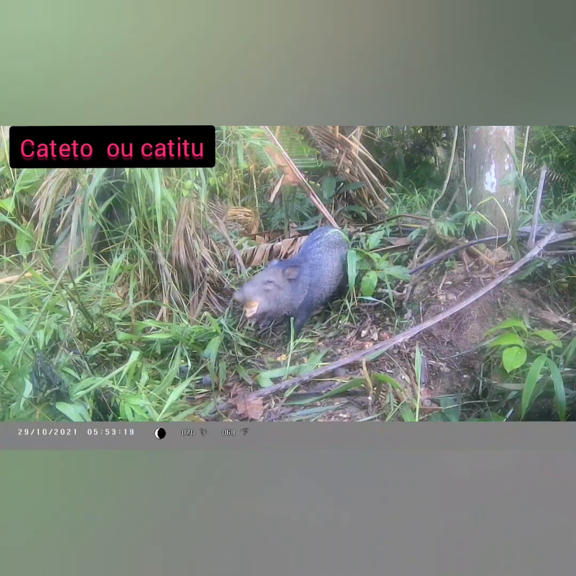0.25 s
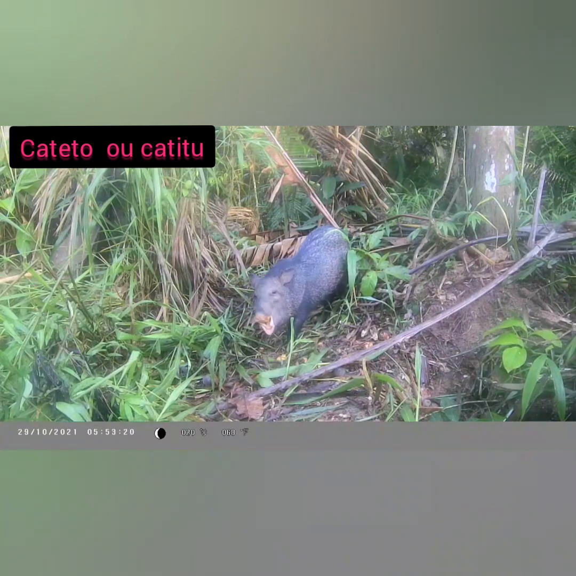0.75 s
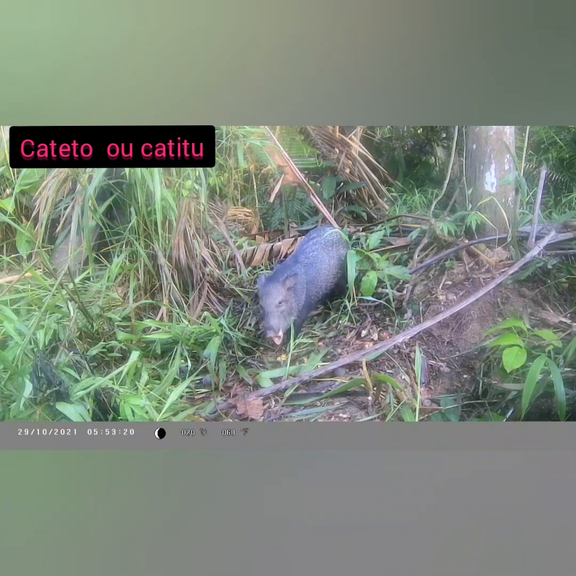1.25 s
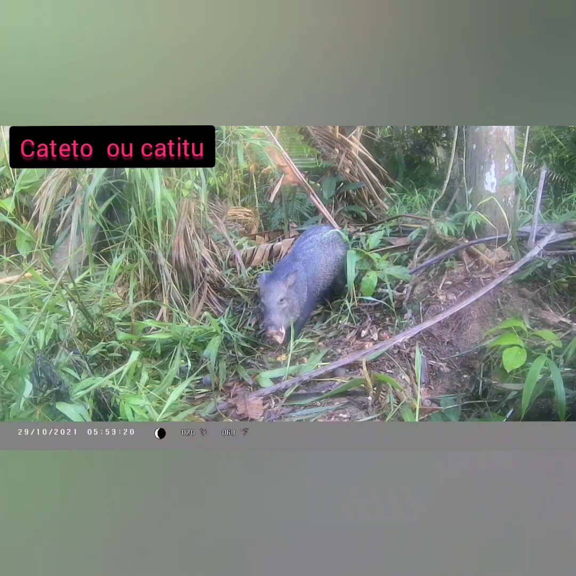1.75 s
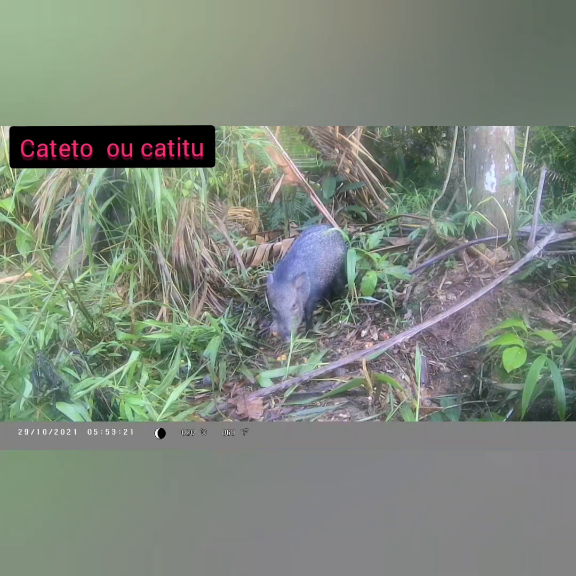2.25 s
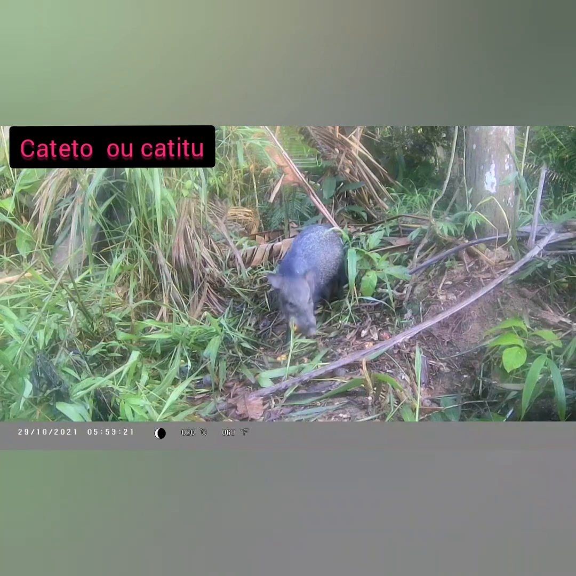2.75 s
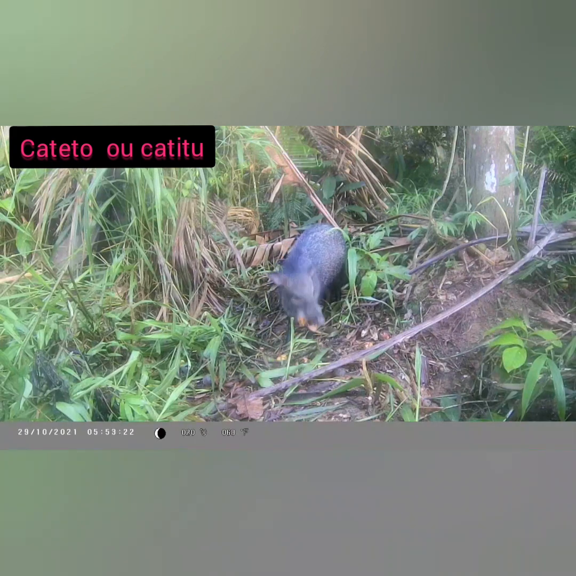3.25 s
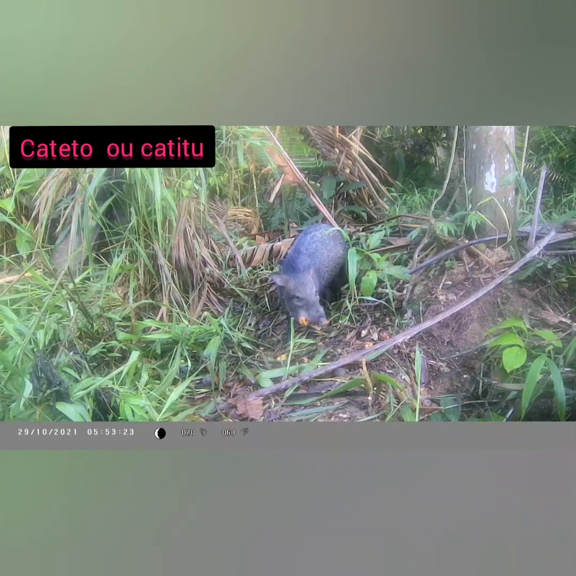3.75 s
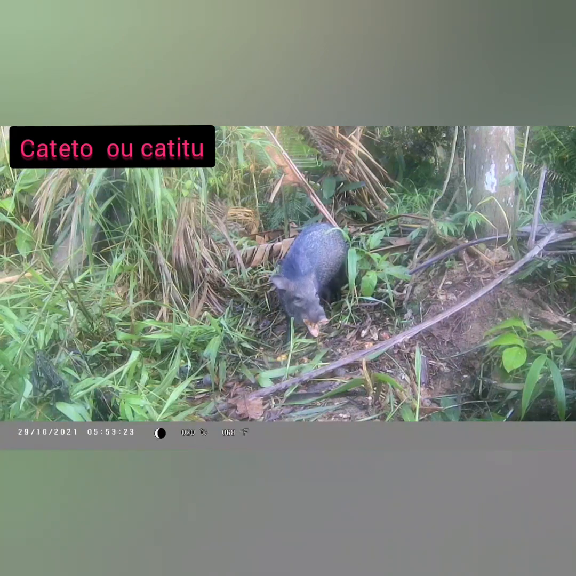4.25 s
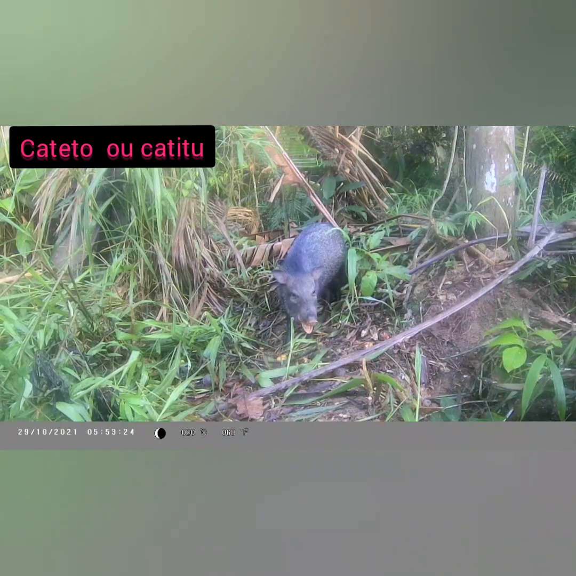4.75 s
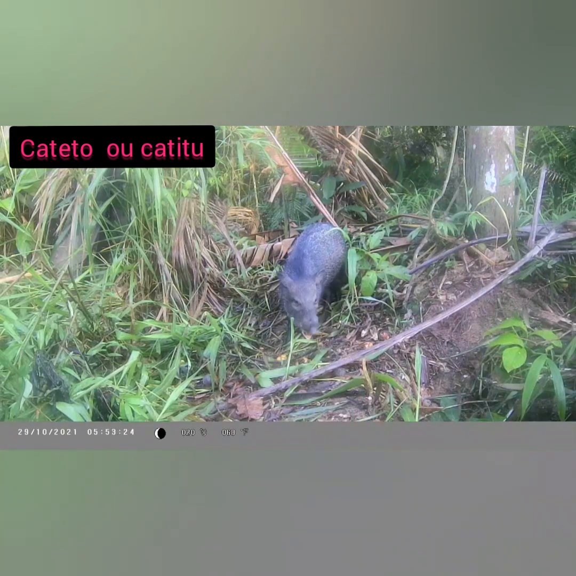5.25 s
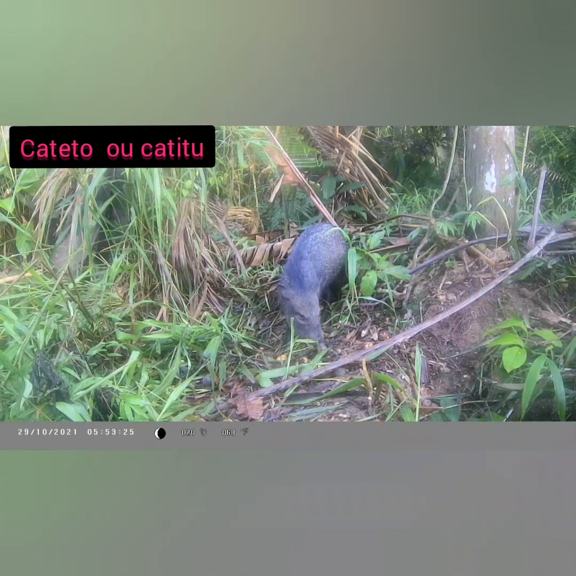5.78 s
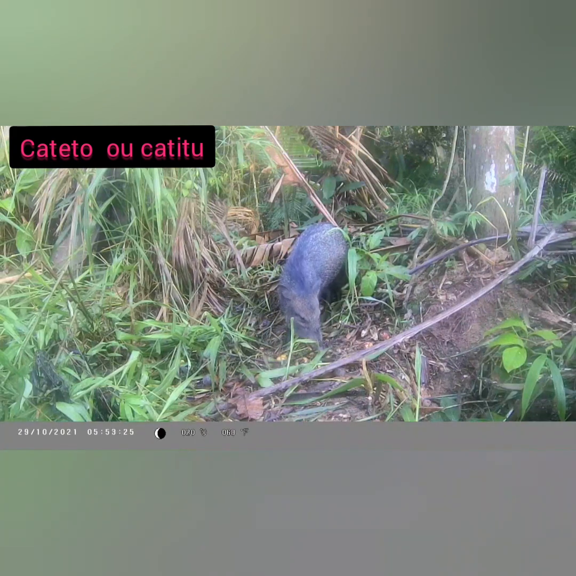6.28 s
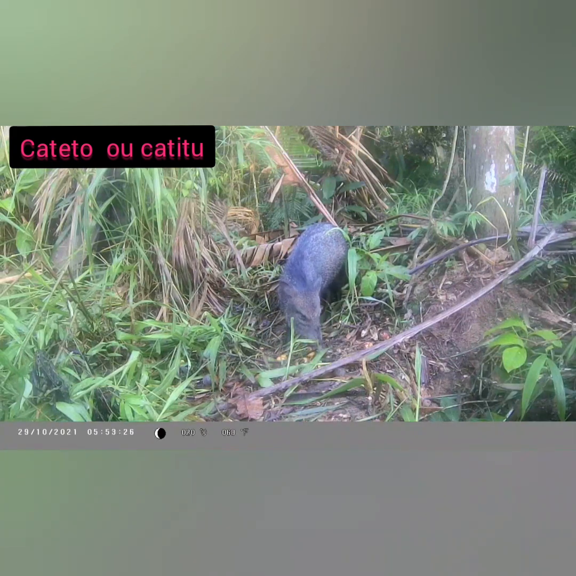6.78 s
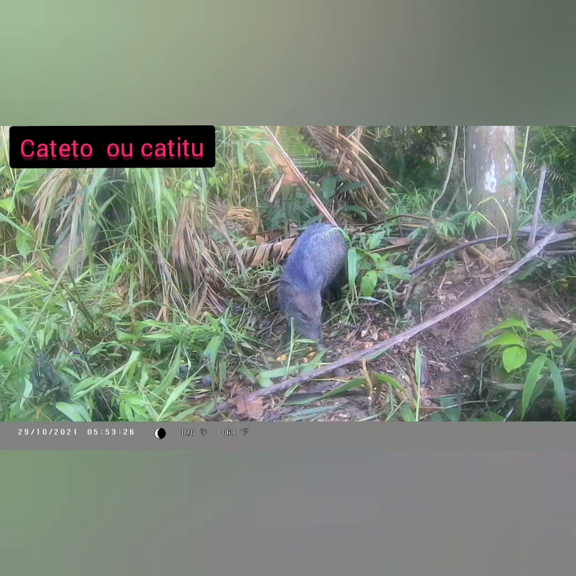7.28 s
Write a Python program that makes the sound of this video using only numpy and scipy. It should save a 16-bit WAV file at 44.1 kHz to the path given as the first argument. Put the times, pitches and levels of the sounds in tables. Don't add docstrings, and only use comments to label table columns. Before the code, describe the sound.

A forest at first light, heard through a small fixed microphone with a soft hiss and very low hum. A clipped frog peep opens, another follows at 0.2 s with a sharp twig snap, then close frogs whistle upward in pairs, long then short, at roughly 0.7, 1.1, 1.7, 2.3, 2.8, 3.1 and 3.7 s. Mid-distance peeps answer, blurred by echoes, over a continuous far chorus that swells around 1 s. High crickets trill in recurring bouts; a nearer one ticks in trains at 2.4-2.8 and 5.2-5.6 s. Faint birds whistle, most busily in the first 1.5 s. Leaves crackle lightly as an animal rummages, strongest from 1.9 to 3.5 s, with scattered snaps and hollow knocks throughout, including a clear snap near 5.0 s. Single peeps cluster at 4.1-5.0 s, pairs resume from 5.4 s, and a loud lone peep comes at 7.4 s near the end.

```python
import sys
import numpy as np
from scipy import signal
from scipy.fft import rfft, irfft
from scipy.io import wavfile

SR = 44100
rng = np.random.default_rng(int(sys.argv[2]) if len(sys.argv) > 2 else 0)


def to_linear_factor(level_db):
    exponent = np.asarray(level_db, float) / 20
    return 10 ** exponent


def unload_wav(signal):
    wavfile.write(
        sys.argv[1],
        SR,
        np.round(np.clip(np.atleast_2d(signal).T, -1, 1) * 32767).astype(np.int16),
    )


N = 331632
TIME = np.arange(N) / SR


def add(out, start_s, sound):
    i = int(round(start_s * SR))
    part = sound[max(-i, 0):max(N - i, 0)]
    out[max(i, 0):max(i, 0) + len(part)] += part


def unit(x):
    return x / np.sqrt(np.mean(x ** 2))


def band(x, lo_hz, hi_hz, order=2):
    return signal.sosfilt(signal.butter(order, [lo_hz, hi_hz], "bandpass", fs=SR, output="sos"), x)


def wander(position, points):
    return np.interp(position, np.arange(points), rng.standard_normal(points))


def whistle(length_s, first_hz, mid_hz, last_hz, swell, over_db=-60, ratio=2, flutter=0., throb=0.,
            attack_s=0.0024, waver=0.):
    flutter_per_s, waver_per_s, throb_hz, release_s = 226.4, 60, 195.5, 0.0041
    u = np.arange(int(length_s * SR)) / (length_s * SR)
    hz = first_hz * (1 - u) * (1 - 2 * u) + mid_hz * 4 * u * (1 - u) + last_hz * u * (2 * u - 1)
    drift = wander(u * length_s * waver_per_s, 32)
    phase = 2 * np.pi * np.cumsum(hz * (1 + waver * drift)) / SR
    edge = np.clip(np.minimum(u / attack_s, (1 - u) / release_s) * length_s, 0, 1)
    fade = wander(u * length_s * flutter_per_s, 64)
    second_voice = throb * u * np.sin(phase - 2 * np.pi * throb_hz * length_s * u)
    tone = np.sin(phase) + to_linear_factor(over_db) * np.sin(ratio * phase) + second_voice
    return np.sqrt(2) * edge * (1 + flutter * fade) * np.exp(swell * (u - 1)) * tone


def forest(calls, early_db, early_t60, late_db, late_t60, sparse=True):
    out = np.zeros(N)
    lag = np.arange(SR // 2) / SR
    early = to_linear_factor(-60 * lag / early_t60)
    late = to_linear_factor(-60 * lag / late_t60)
    shape = to_linear_factor(early_db) * early / np.linalg.norm(early) + to_linear_factor(late_db) * late / np.linalg.norm(late)
    for start_s, sound in calls:
        paths = rng.standard_normal(len(lag))
        if sparse:
            paths = paths ** 3 / np.sqrt(15)
        paths = paths * shape
        paths[0] = 1
        add(out, start_s, signal.fftconvolve(sound, paths))
    return out


def peeps(rows, swell):
    top_hz, sweep_hz_per_s, lowest_hz = 5022, 14000, 4170
    calls = []
    for start_s, length_s, db in rows:
        hz = max(top_hz - sweep_hz_per_s * length_s, lowest_hz)
        call = whistle(length_s - .005, hz, hz + 0.63 * (top_hz - hz), top_hz, swell, over_db=-27.5,
                       ratio=3 / 2, flutter=0.42, throb=0.77, attack_s=0.0074)
        calls.append((start_s + .008, to_linear_factor(db - 3.0) * unit(call)))
    return calls


def near_frogs():
    # start in seconds, length in seconds, level in dB.
    single_peeps = [
        (.01, 0.038, -34.5),
        (.175, 0.055, -37),
        (4.077, 0.068, -37),
        (4.204, 0.038, -34),
        (4.872, .05, -37),
        (4.918, .04, -41.5),
        (4.943, 0.077, -36.5),
        (5.03, .035, -48.5),
        (7.412, 0.044, -33),
    ]
    # start in seconds, length in seconds, level in dB, wait in seconds to the second peep,
    # level of the second in dB.
    peep_pairs = [(0.698, 0.054, -34.5, 0.11, -33.5), (1.129, 0.046, -38, 0.11, -36.5),
                  (1.172, 0.044, -34, 0.11, -33.5), (1.674, 0.054, -31.5, 0.13, -29),
                  (2.309, 0.059, -33.5, 0.13, -33), (2.821, 0.062, -37, .130, -35.5),
                  (3.137, 0.047, -34, .114, -34), (3.679, .057, -37, 0.12, -34),
                  (4.307, 0.056, -33.5, 0.13, -35), (5.396, 0.047, -31.5, 0.11, -33),
                  (5.65, 0.059, -38, .122, -37.5), (5.892, 0.047, -33.5, 0.12, -30.5),
                  (6.488, 0.065, -38, 0.12, -33.5), (6.673, 0.045, -34.5, 0.12, -34),
                  (7.073, 0.061, -36.5, 0.12, -36)]
    # delay in seconds, level in dB.
    trunk_echoes = [
        (.00611, -12),
        (.0135, -7),
        (0.022, -16),
        (0.03, -13.5),
        (0.047, -11.5),
    ]
    second_s = 0.0321
    rows = list(single_peeps)
    for start_s, length_s, db, wait_s, second_db in peep_pairs:
        rows += [(start_s, length_s, db), (start_s + wait_s, second_s, second_db)]
    near = forest(peeps(rows, 0.59), -7.0, 0.054, -10.0, 0.58)
    near = near + sum(to_linear_factor(db) * np.pad(near, (int(lag * SR), 0))[:N] for lag, db in trunk_echoes)
    near = near + to_linear_factor(-7) * band(near, 4410, 4930, order=1)
    return to_linear_factor(-9.0) * near


def middle_frogs():
    # start in seconds, level in dB.
    middle_peeps = [(.965, -50), (1.063, -59), (1.478, -48.5), (1.58, -61), (1.905, -48.5), (2.091, -46),
                    (2.201, -58.5), (2.647, -45.5), (2.757, -46.5), (3.381, -48), (3.473, -46.5),
                    (4.252, -57), (4.626, -53), (4.722, -46.5), (5.203, -64), (5.55, -51.5), (6.135, -49),
                    (6.253, -50), (6.86, -54), (7.023, -48.5)]
    rows = [(start_s, 0.058, db) for start_s, db in middle_peeps]
    return to_linear_factor(-13.0) * forest(peeps(rows, 1.1), 9, .11, 5, .6)


def deep_frog():
    # start in seconds, level in dB.
    deep_peeps = [(0.063, -76), (0.664, -69), (1.089, -70), (1.532, -69), (2.029, -72), (2.504, -72),
                  (2.963, -73), (3.372, -69.5), (3.881, -73), (4.329, -74), (4.88, -69.5), (5.329, -72),
                  (5.789, -73), (6.285, -72), (6.712, -69), (7.186, -72.5)]
    calls = [(start_s, to_linear_factor(db) * whistle(.1, 4010, 4470, 4880, swell=-.5, flutter=.4))
             for start_s, db in deep_peeps]
    return to_linear_factor(3.0) * forest(calls, 2, .25, 6, 1.)


def far_frogs(count=1000, perches=7):
    # time in seconds, level in dB.
    chorus_swell = [(0, 0.5), (.3, 2), (.6, -4.5), (1.0, 3.5), (1.5, -0.5), (2.25, -0.5), (3.0, 0),
                    (3.7, -0.5), (4.5, -0.5), (5.7, 0.5), (6.4, -1), (7.0, 0), (7.52, 0)]
    direct = [np.zeros(N) for _ in range(perches)]
    for k, (when, pitch, size) in enumerate(rng.random((count, 3))):
        if k % 3:
            call = whistle(0.042, 4200 + 280 * pitch, 4700 + 250 * pitch, 4880 + 420 * pitch,
                           swell=0.5, flutter=0.2, throb=0.43)
        else:
            call = to_linear_factor(-8) * whistle(.09, 4120 + 90 * pitch, 4520, 4880, swell=0, flutter=.5)
        add(direct[k // 3 % perches], when * (N / SR + .4) - .4, to_linear_factor(-6 * size) * call)
    echoing = forest([(0, d) for d in direct], 18.0, 0.097, 8.1, 0.5, sparse=False)
    wash = band(rng.standard_normal(N), 4275, 5015, order=3)
    chorus = unit(unit(echoing) + to_linear_factor(-3.5) * unit(wash))
    return to_linear_factor(-53.5 + np.interp(TIME, *np.transpose(chorus_swell))) * chorus


def low_cricket():
    # start in seconds, end in seconds, notes a second, level in dB.
    note_groups = [
        (.722, 1.085, 11.3, -61.5),
        (2.235, 2.69, 11.5, -61.5),
        (3.838, 4.2, 11, -61),
        (4.9, 5.26, 11.5, -63),
        (6.325, 6.69, 11.5, -62),
    ]
    note = whistle(.052, 4090, 4060, 3945, swell=.5, over_db=-20)
    calls = [(s, to_linear_factor(db) * note) for start_s, end_s, rate, db in note_groups
             for s in np.arange(start_s, end_s - len(note) / SR, 1 / rate)]
    return forest(calls, -7, .1, -10, .5)


def trill(start_s, end_s, rate, db):
    stroke = whistle(0.012, 5900, 5760, 5590, swell=0)
    beats = np.zeros(int((end_s - start_s) * SR))
    starts = np.arange(0, len(beats), SR / rate)
    chance = rng.standard_normal((len(starts), 2))
    places = (starts + .11 * SR / rate * chance[:, 0]).astype(int)
    beats[np.clip(places, 0, len(beats) - 1)] = to_linear_factor(db - 4.0 + 2.6 * chance[:, 1])
    return start_s, signal.fftconvolve(beats, stroke)


def high_cricket():
    # start in seconds, end in seconds, wing strokes a second, level in dB.
    trills = [
        (0.473, 1.0, 43, -62),
        (1.54, 2.166, 31, -59.5),
        (2.834, 3.297, 50, -65.5),
        (3.788, 4.36, 32, -63.5),
        (4.861, 5.499, 36, -63),
        (6.012, 6.599, 42, -63),
        (7.114, 7.52, 30, -62.5),
    ]
    return to_linear_factor(-6.5) * forest([trill(*row) for row in trills], 7.5, 0.14, 4.0, 0.77, sparse=False)


def near_cricket():
    # first stroke in seconds, end in seconds, pitch in Hz, climb in Hz a second, first level in dB.
    stroke_trains = [
        (2.3758, 2.39, 5600, 0, -52),
        (2.4135, 2.785, 5780, 30, -48.5),
        (5.228, 5.25, 5300, 0, -50),
        (5.3596, 5.6, 5210, 1350, -49.5),
    ]
    period_s, effort_db_per_khz = .0441, 22
    calls = []
    for start_s, end_s, first_hz, climb_hz, first_db in stroke_trains:
        for s in np.arange(start_s, end_s, period_s):
            rise_hz = climb_hz * (s - start_s)
            hz = first_hz + rise_hz
            db = first_db + effort_db_per_khz * rise_hz / 1000
            calls.append((s - .003, to_linear_factor(db - 6.0) * whistle(0.021, 1.004 * hz, hz, .994 * hz, swell=-0.25)))
    return forest(calls, -20.5, 0.16, -12.0, 0.4)


def katydid():
    ticks_per_s = 72
    chance = rng.standard_normal((int(ticks_per_s * N / SR), 2))
    places = (np.arange(len(chance)) + .08 * chance[:, 0]) * SR / ticks_per_s
    ticks = np.zeros(N)
    ticks[np.clip(places.astype(int), 0, N - 1)] = to_linear_factor(3.9 * chance[:, 1])
    wave_db = 3.6 * wander(TIME * 3, 32)
    return to_linear_factor(-85 + wave_db) * unit(band(ticks, 6600, 7950))


def high_insects():
    ticks = rng.standard_normal(N) * (rng.random(N) < .05)
    haze = unit(band(ticks, 5300, 5970) + to_linear_factor(-6.5) * band(ticks, 6500, 6750))
    return to_linear_factor(-68.5 + .5 * TIME) * haze


def bird_notes(rows, arch, flutter):
    calls = []
    for start_s, length_s, first_hz, last_hz, db in rows:
        mid_hz = min(first_hz, last_hz) + arch * abs(last_hz - first_hz)
        note = whistle(length_s, first_hz, mid_hz, last_hz, swell=0.17, flutter=flutter, attack_s=0.0074, waver=.009)
        calls.append((start_s, to_linear_factor(db) * note))
    return calls


def birds():
    # start in seconds, length in seconds, first pitch in
    # Hz, last pitch in Hz, level in dB.
    high_bird = [(.28, 0.044, 3280, 3370, -66), (.29, 0.026, 2990, 2920, -65.5),
                 (.352, 0.04, 2550, 2950, -65), (.388, 0.045, 2930, 3030, -59.5),
                 (.43, 0.044, 3020, 3190, -66), (.465, 0.052, 3160, 3170, -59.5),
                 (.49, 0.019, 3030, 2970, -65.5), (.815, 0.06, 2640, 2910, -68),
                 (.852, 0.03, 2950, 2973, -53.5), (.89, .05, 2980, 3300, -61),
                 (.94, 0.032, 3310, 3090, -55), (.4, 0.21, 7780, 7640, -72), (1.04, 0.03, 2670, 2630, -66),
                 (1.14, 0.041, 2900, 2816, -67.5), (1.312, 0.074, 2480, 2825, -61.5),
                 (1.365, 0.11, 2924, 3220, -61), (1.45, 0.026, 2994, 2920, -60),
                 (2.82, 0.05, 3270, 3280, -66.5), (2.87, 0.11, 3230, 3140, -70.5),
                 (3.148, 0.017, 2740, 2770, -61), (4.982, 0.072, 2860, 2910, -68.5),
                 (5.012, 0.054, 3090, 3200, -69.5), (5.2, 0.045, 3090, 2980, -66),
                 (5.31, 0.072, 3090, 3200, -67), (5.36, 0.081, 2996, 2950, -69),
                 (5.344, 0.032, 2730, 2640, -65), (5.368, 0.038, 2500, 2360, -66),
                 (6.555, 0.035, 3150, 2780, -69), (6.585, 0.024, 2690, 2700, -66),
                 (6.615, 0.16, 2750, 2750, -76.5), (1.53, 0.055, 3050, 3160, -66),
                 (6.92, 0.062, 2750, 2560, -69), (.71, 0.28, 6800, 7120, -69.5),
                 (.75, 0.042, 3330, 3280, -66), (0, 0.13, 2860, 2920, -75)]
    low_bird = [(1.39, 0.072, 2706, 2370, -62), (1.468, 0.044, 2210, 2160, -65),
                (1.913, 0.013, 1940, 1920, -60), (1.235, .025, 2140, 2160, -69),
                (1.35, 0.045, 2450, 2400, -69), (1.69, 0.037, 2180, 2400, -73),
                (2.752, .02, 2730, 2580, -67.5), (2.93, 0.041, 2634, 2450, -66.5),
                (3.015, 0.028, 2460, 2760, -63.5), (3.597, 0.09, 2220, 2386, -68),
                (3.69, 0.094, 2390, 2220, -71), (3.925, .04, 1925, 1990, -73),
                (3.965, 0.035, 2400, 2020, -74), (4.22, 0.039, 1430, 1430, -74),
                (4.27, .07, 1370, 1320, -80), (4.1, .04, 2330, 2470, -77), (4.21, .03, 2390, 2550, -72),
                (4.56, 0.14, 2240, 2340, -75.5), (4.655, 0.078, 2236, 1850, -68.5),
                (4.66, 0.066, 2470, 2450, -78), (4.72, 0.1, 2120, 1950, -76.5),
                (5.025, .04, 2290, 2190, -65.5), (5.06, 0.058, 2275, 2330, -71.5),
                (5.07, 0.12, 2280, 2070, -70.5), (5.14, .13, 2195, 2170, -74),
                (5.16, .1, 1880, 1726, -70.5), (5.09, 0.11, 2060, 1984, -72.5),
                (5.547, 0.062, 2210, 2300, -72), (5.615, .08, 2347, 2264, -70),
                (5.7, 0.097, 2365, 2330, -76), (5.91, 0.2, 2195, 2220, -78.5),
                (6.13, 0.082, 2250, 2385, -69), (6.2, 0.12, 2385, 2367, -72.5),
                (6.44, 0.21, 2210, 2200, -79), (6.869, 0.066, 2520, 2320, -70.5),
                (6.958, 0.07, 2540, 2345, -64), (7.04, 0.074, 2155, 2220, -69)]
    near_birds = [(2.172, 0.071, 7400, 2940, -58.5), (5.058, 0.04, 3600, 3750, -59.5),
                  (5.096, 0.031, 3700, 3200, -63), (5.21, 0.043, 2650, 2725, -61.5),
                  (5.25, 0.08, 2740, 3020, -68.5), (2.855, 0.05, 3240, 2720, -68),
                  (3.04, 0.038, 3040, 3075, -68), (3.08, .058, 3100, 2640, -65.5),
                  (2.97, 0.053, 2420, 2440, -68), (3.99, 0.14, 2020, 1600, -74),
                  (2.725, .035, 2500, 2510, -70.5), (5.7, 0.16, 2225, 2190, -76),
                  (6.27, .17, 2205, 2200, -75.5), (4.4, .1, 2200, 2295, -71.5),
                  (4.74, 0.099, 1800, 1765, -70)]
    far_notes = bird_notes(high_bird, 0.7, .4) + bird_notes(low_bird, .5, .45)
    far = forest(far_notes, -3, .14, .5, 1., sparse=False)
    near = forest(bird_notes(near_birds, .5, .33), -7, .12, -4, .8, sparse=False)
    return to_linear_factor(-5.0) * far + near


def rummaging():
    # middle in seconds, length in seconds, level in dB.
    bouts = [
        (0.437, 0.31, -75.5),
        (1.16, 0.15, -70),
        (1.887, 0.29, -70),
        (2.106, 0.25, -67),
        (2.7, 0.16, -67.5),
        (2.965, 0.075, -66.5),
        (3.515, 0.099, -70),
        (4.92, .25, -84),
    ]
    power = to_linear_factor(2 * -76) + sum(to_linear_factor(2 * db) * np.exp(-(2 * (TIME - s) / length) ** 2) for s, length, db in bouts)
    loudness = to_linear_factor(3.0 * np.minimum(rng.exponential(size=N), 5))
    grains = rng.standard_normal(N) * loudness * (rng.random(N) < .06)
    crackle = unit(band(grains, 6300, 7530) + to_linear_factor(-8) * band(grains, 680, 5000, order=1))
    stir_db = 2.7 * wander(TIME * 12, 128)
    return np.sqrt(power) * to_linear_factor(stir_db) * crackle


def snaps():
    # time in seconds, middle band peak in dB, low band peak in dB, high band peak in dB.
    breaks = [(0.205, -40.5, -47.5, -46.5), (.537, -61, -75, -70), (.617, -52, -73, -63),
              (1.573, -66.5, -71, -51.5), (2.688, -56.5, -73, -68), (0.3936, -42, -47, -58),
              (1.2603, -48, -62, -61), (1.726, -57, -75, -55.5), (1.93, -49, -70, -71),
              (2.0117, -44, -50, -67), (2.355, -46, -61, -56), (2.9532, -50, -55, -47.5),
              (2.968, -46, -55, -49), (3.035, -44.5, -67, -51.5), (3.106, -52, -75, -45),
              (3.1366, -46.5, -48, -57.5), (3.3835, -49.5, -69, -70), (3.316, -54, -68, -70),
              (3.459, -49.5, -52, -67), (3.671, -52, -75, -72), (3.5097, -49, -52, -66),
              (3.5314, -49, -54, -59), (3.716, -53, -63, -75), (4.121, -55, -60, -60),
              (4.543, -48, -65.5, -62), (5.0413, -39.5, -58, -68), (5.3028, -61, -69, -56),
              (5.4855, -45, -53, -67), (5.65, -49.5, -61, -65), (5.9088, -48.5, -54, -62),
              (6.065, -52.5, -67, -56.5), (6.6531, -45.5, -55, -67), (6.819, -50, -64, -65),
              (7.086, -48, -79, -58.5), (7.164, -48, -59, -73), (7.3475, -45.5, -58, -67)]
    out = np.zeros(N)
    lag = np.arange(SR // 20) / SR
    fading = to_linear_factor(-60 * lag / 0.0044) + to_linear_factor(-6.5 - 60 * lag / 0.084)
    for s, mid_db, low_db, high_db in breaks:
        burst = rng.standard_normal(len(lag)) * fading
        burst[0] = 4.9
        for db, lo_hz, hi_hz in ((mid_db - 1.5, 600, 3060), (low_db, 140, 790), (high_db + 2.5, 5600, 7330)):
            part = band(burst, lo_hz, hi_hz)
            add(out, s, to_linear_factor(db) * part / np.abs(part).max())
    return out


def knocks():
    # time in seconds, peak in dB, pitch in Hz, ring in seconds.
    hits = [(.204, -46, 1000, .03), (.2045, -48, 1600, .025), (4.546, -56, 1480, .04),
            (5.03, -55, 1800, .03), (.389, -54.5, 800, .05), (1.572, -50, 5400, .03),
            (1.575, -56, 6200, .025), (1.727, -59, 1360, .047), (2.0, -58.5, 820, .17),
            (2.365, -55, 791, .06), (3.093, -51, 5300, .04), (3.503, -56, 3300, .04),
            (3.508, -53, 848, .11), (3.531, -55, 3250, .04), (3.532, -57, 2950, .03),
            (3.545, -57, 900, .08), (3.535, -50.5, 720, .047), (4.75, -53.5, 660, .035),
            (5.04, -49.5, 1000, .047), (5.084, -52.5, 620, .053), (5.374, -56, 440, .073),
            (5.4, -56, 320, .1), (5.642, -48.5, 190, .036), (5.655, -53, 330, .043),
            (5.907, -56.5, 910, .038), (6.82, -58, 1050, .04)]
    out = np.zeros(N)
    lag = np.arange(SR // 20) / SR
    soft_end = np.cos(np.pi * np.minimum(lag / lag[-1], 1) / 2)
    for s, db, hz, ring_s in hits:
        add(out, s, to_linear_factor(db - 60 * lag / ring_s) * np.sin(2 * np.pi * hz * lag) * soft_end)
    return out


def camera_hiss():
    # pitch in Hz, strength in dB per Hz.
    hiss_colour = [(4, -4.5), (12, 2), (40, -2.5), (120, -13), (400, -23.5), (1000, -28.5), (1600, -31.5),
                   (2600, -29.5), (3800, -30.5), (6500, -25), (7300, -33), (8400, -53), (9000, -64),
                   (9300, -86)]
    hz, db = np.transpose(hiss_colour)
    noise_hz = np.arange(N // 2 + 1) * SR / N
    colour = to_linear_factor(np.interp(np.log(noise_hz + 1e-3), np.log(hz), db))
    return to_linear_factor(-57) * unit(irfft(rfft(rng.standard_normal(N)) * colour, N))


def camera_hum():
    # multiple of the clock, rms level in dB.
    clock_hum = [(1, -55), (2, -68.5), (3, -79), (4, -80), (5, -80), (8, -87.5), (27, -95), (28, -86),
                 (29, -74.5), (30, -86.5), (31, -91), (87, -88), (116, -99)]
    # pitch in Hz, rms level in dB.
    second_hum = [
        (20.05, -66),
        (40.16, -74),
        (71.26, -79),
    ]
    clock_hz = 24.301
    lines = [(k * clock_hz, db) for k, db in clock_hum] + list(second_hum)
    return sum(np.sqrt(2) * to_linear_factor(db) * np.cos(2 * np.pi * hz * TIME) for hz, db in lines)


def scene():
    frogs = near_frogs() + middle_frogs() + deep_frog() + far_frogs()
    insects = low_cricket() + high_cricket() + near_cricket() + katydid() + high_insects()
    litter = rummaging() + snaps() + knocks()
    return (frogs + insects + birds() + litter + camera_hiss() + camera_hum())[None]


def low_pass(x):
    return signal.sosfilt(signal.butter(12, 9020, fs=SR, output="sos"), x)


def record(dry):
    camera_rate_hz, top_cut_hz, offset = 16000, 8500, .00557
    mirror = band(2 * dry * np.cos(2 * np.pi * camera_rate_hz * TIME), 7540, 7940)
    top_cut = signal.butter(10, top_cut_hz, fs=SR, output="sos")
    mix = signal.sosfilt(top_cut, dry + mirror) + offset
    return low_pass(mix)


dry = scene()
out = record(dry)
unload_wav(out)
```